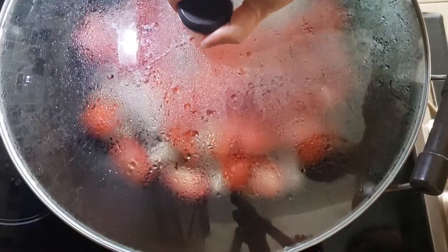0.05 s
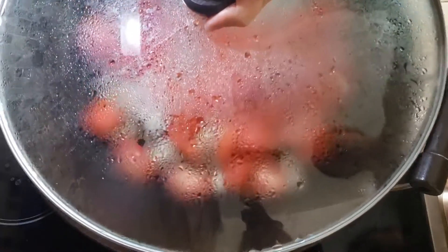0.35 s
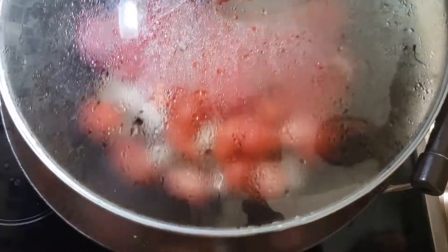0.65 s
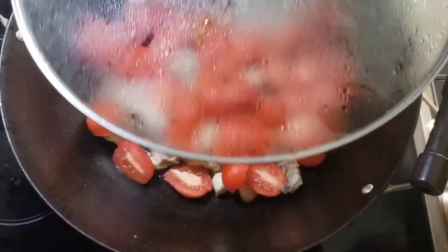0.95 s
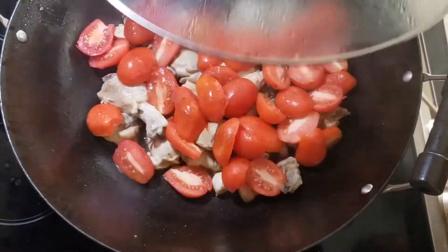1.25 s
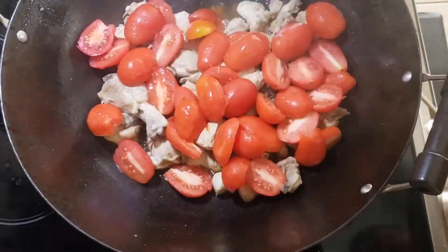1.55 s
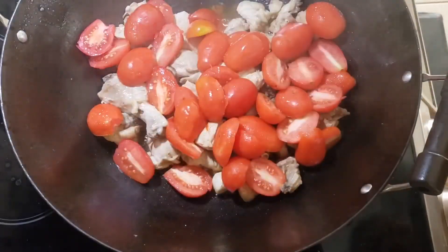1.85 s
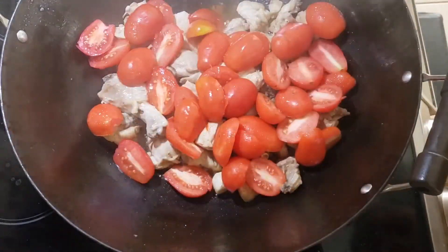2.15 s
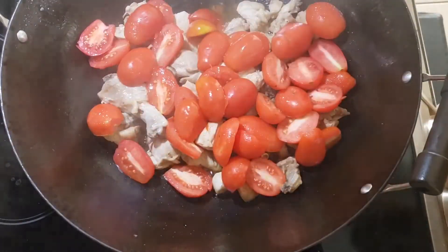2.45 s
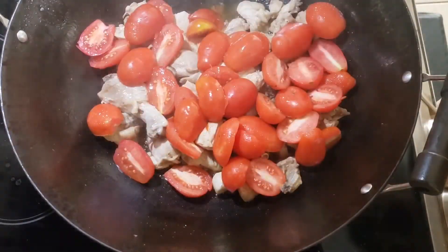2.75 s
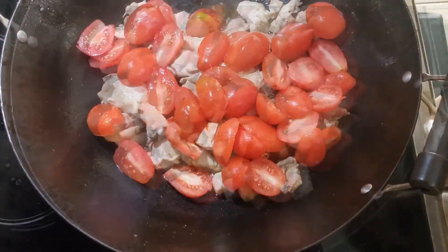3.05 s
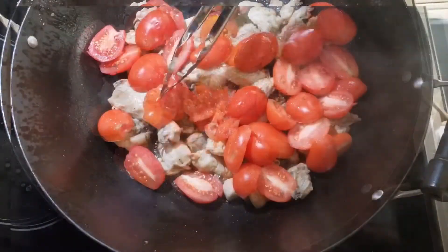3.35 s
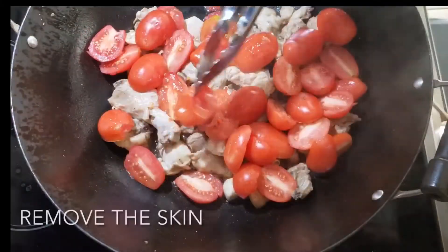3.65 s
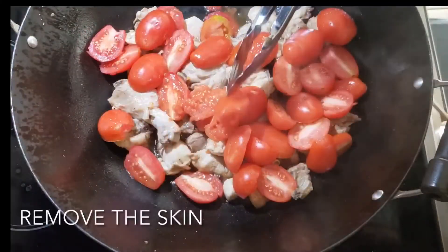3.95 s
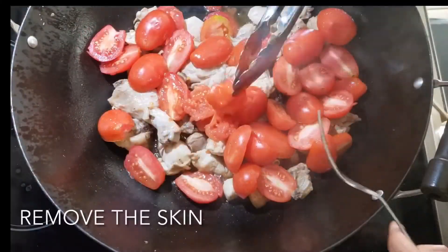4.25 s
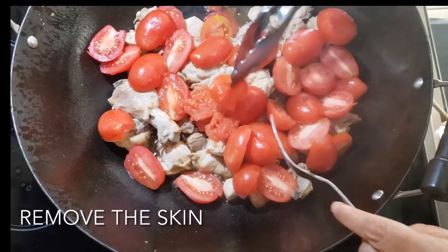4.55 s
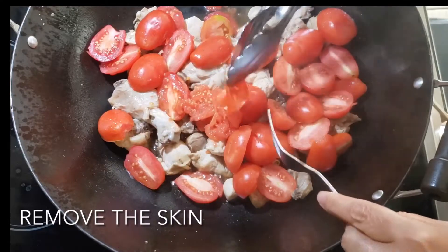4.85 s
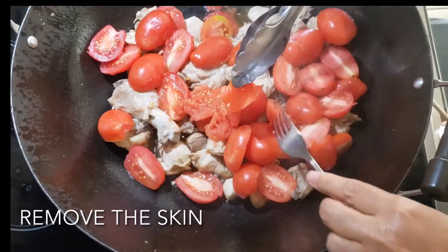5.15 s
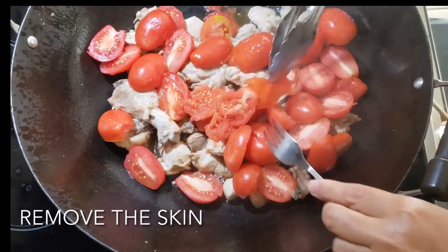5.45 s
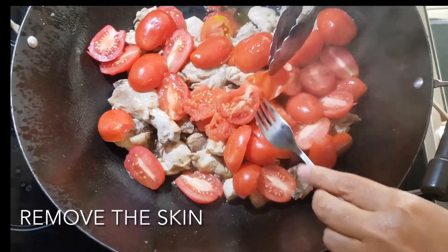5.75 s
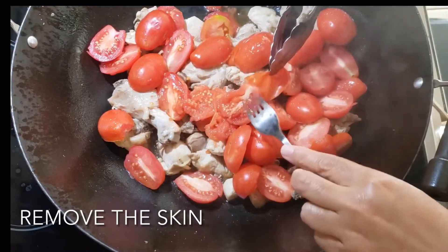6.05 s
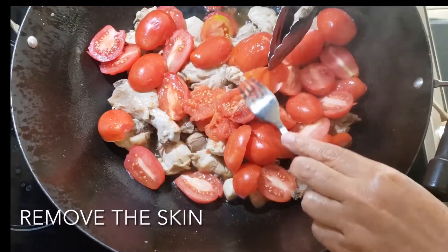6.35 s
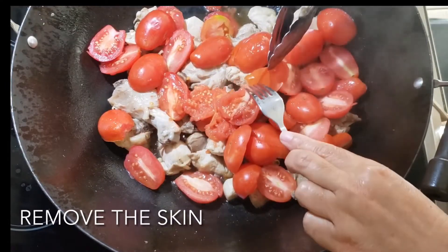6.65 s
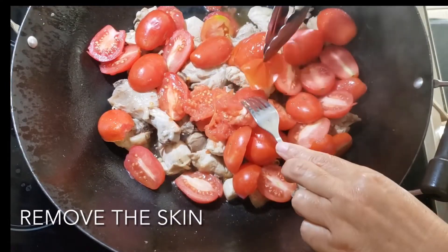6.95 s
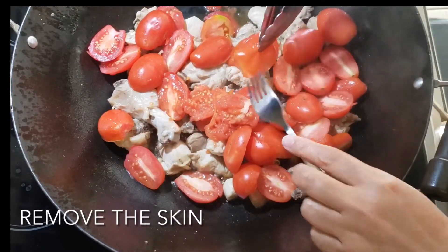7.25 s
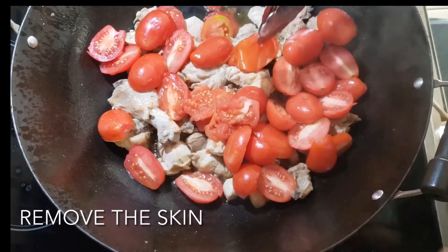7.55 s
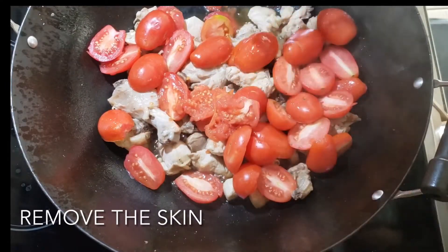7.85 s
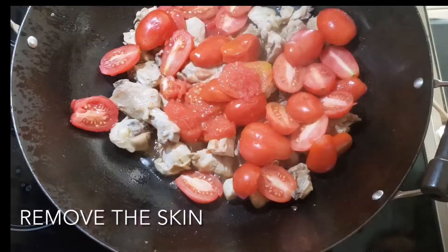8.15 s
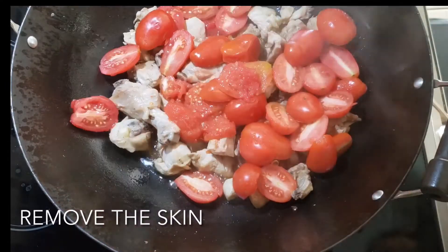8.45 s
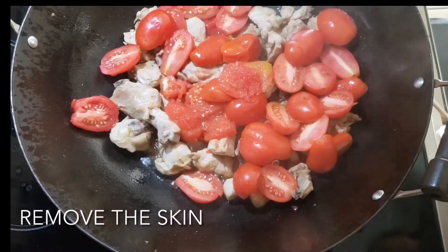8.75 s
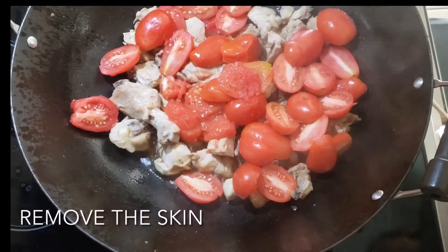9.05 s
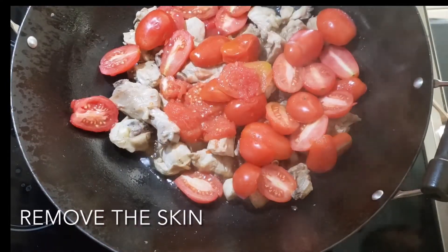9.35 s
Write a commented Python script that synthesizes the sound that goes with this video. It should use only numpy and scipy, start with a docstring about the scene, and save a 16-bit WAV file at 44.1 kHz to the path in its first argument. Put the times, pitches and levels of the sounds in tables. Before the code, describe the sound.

Over a low motor hum in a kitchen, a bird cries nasally outside as a glass lid knocks on a wok. Close sizzling of tomatoes grows, with spitting drips and sharp pops, until the lid is set down with two clanks. Only a gentle hiss follows, with tiny wet tearing sounds and low puffs of air on the microphone. The bird cries again now and then, answered from afar, with a few faint chirps and whistles.

```python
"""Tomatoes sizzle in a wok, close to the microphone in a kitchen. The glass lid is lifted, drips spit
on the hot steel, fat bubbles burst and the lid is set down. The sizzle sinks to a soft hiss and the
image closes to mono; wet skins tear as they are pulled off. Motors hum and air buffets the microphone.
Outside, a bird's nasal, falling cries rebound from walls and are answered from afar, among a few
chirps and distant whistles."""
import sys
import numpy as np
from scipy import signal
from scipy.fft import rfft, irfft
from scipy.io import wavfile
from scipy.ndimage import uniform_filter1d

SR = 44100
rng = np.random.default_rng(int(sys.argv[2]) if len(sys.argv) > 2 else 0)


def inscribe(sig):
    """Save sig as 16-bit PCM at rate SR to the path in sys.argv[1].

    A 1-D sig is mono; a 2-D sig holds one channel per row.
    Samples are clipped to [-1, 1] before scaling.
    """
    pcm = np.round(np.clip(np.atleast_2d(sig).T, -1, 1) * 32767)
    wavfile.write(sys.argv[1], SR, pcm.astype(np.int16))


N = 414540
TIME = np.arange(N) / SR

# the nasal voice of cry and answer, led by its fourth partial: (multiple of the pitch, level [dB])
CRY_SPECTRUM = [(2, -11.5), (3, -16.5), (4, -4.5), (5, -15.5), (6, -24), (7, -23), (8, -18), (9, -25),
                (10, -23), (11, -20), (12, -25.5), (13, -33), (14, -24), (15, -23), (16, -23)]


def from_db(db):
    """Decibels to gain."""
    return 10 ** (np.asarray(db) / 20)


def rms_one(x):
    """Scale to unit power."""
    return x / np.sqrt(np.mean(x ** 2) + 1e-20)


def level(rows):
    """A curve of (time [s], level [dB]) as a gain at every sample."""
    return from_db(np.interp(TIME, *np.transpose(rows)))


def drift(per_s, count=N):
    """A random wander between knots with a spread of 1."""
    knots = rng.standard_normal(2000)
    return np.interp(TIME[:count] * per_s, np.arange(len(knots)), knots)


def coloured(x, spectrum, tilt_db=0):
    """Give x a spectrum, tilted per octave above 800 Hz; unit power."""
    octave = np.log2(np.maximum(np.arange(N // 2 + 1) * SR / N, 1))
    hz, db = np.transpose(spectrum)
    shape_db = np.interp(octave, np.log2(hz), db) + tilt_db * np.maximum(octave, np.log2(800))
    low_cut_db = 18 * np.minimum(octave - np.log2(hz[0]), 0)
    return rms_one(irfft(rfft(x) * from_db(shape_db + low_cut_db), N))


def crackle(per_s, spread_db, smooth):
    """Tiny bursts of uneven size over a smooth hiss, unrelated in two channels."""
    sizes = from_db(spread_db * np.minimum(rng.exponential(1, (2, N)), 4)) * rng.choice([-1, 1], (2, N))
    clicks = rms_one(sizes * (rng.random((2, N)) < per_s / SR))
    return rms_one(clicks + smooth * rng.standard_normal((2, N)))


def spread(pair, side, left_db):
    """Two unrelated signals as mid and side, leaning left; the side carries no bass."""
    wide = signal.sosfilt(signal.butter(2, 500, "high", fs=SR, output="sos"), pair[1])
    return (pair[0] + side * wide * np.array([[1], [-1]])) * from_db([[left_db / 2], [-left_db / 2]])


def add(out, x, start):
    """Mix x in at a time in seconds."""
    at = max(round(start * SR), 0)
    out[at:at + len(x)] += x[:N - at]


def burst(start, length, t60, rise=0.00096):
    """An envelope: rise, hold, exponential fall."""
    out, age = np.zeros(N), TIME[:SR]
    add(out, np.minimum(age / rise, 1) * from_db(-60 * np.maximum(age - length, 0) / t60), start)
    return out


def swell(start, length, rise=0.058, fall=0.18):
    """An envelope: rise, hold, straight fall."""
    return np.interp(TIME, start + np.cumsum([0, rise, max(length - rise, 0), fall]), [0, 1, 1, 0])


def strike(modes, scatter_db):
    """One blow rings every mode with a strength of its own."""
    t, ring = TIME[:SR // 3], 0
    for k, (hz, db, t60) in enumerate(modes):
        decay = from_db(db + scatter_db * rng.normal() - 60 * t / t60)
        ring += (-1) ** k * decay * np.sin(2 * np.pi * hz * t)
    return ring


def blows(rows, modes):
    """Blows on one body; a soft contact loses its treble."""
    out = np.zeros(N)
    for start, db, cutoff_hz in rows:
        pole = np.exp(-2 * np.pi * cutoff_hz / SR)
        ring = signal.lfilter([1 - pole], [1, -pole], strike(modes, scatter_db=1))
        add(out, from_db(db) * ring, start)
    return out


def echoes(x, t60, build_s):
    """Scattered reflections, different on each side, with the power of x."""
    t = TIME[:SR]
    tail = rng.standard_normal((2, SR)) * from_db(-60 * t / t60) * np.clip(t / build_s, 0, 1) ** 2
    return signal.fftconvolve(x[None], tail / np.sqrt(np.sum(tail ** 2) / 2), axes=1)[:, :N]


def room_and_motors(settled):
    """The kitchen's low rumble holds a faint steady tone; motors hum over it."""
    # the rumble's faint low tone (49.5 Hz), then the motors' hum lines:
    # (frequency [Hz], level during the sizzle [dB], level afterwards [dB])
    steady_tones = [(49.5, -63, -63), (89.7, -60, -60), (119.8, -58.5, -76), (179.3, -71, -78),
                    (193, -80, -70.5), (239.6, -74, -90)]
    # the rumble: (frequency [Hz], level [dB])
    room_colour = [(12, -39), (25, -4.5), (50, -1), (70, -6), (105, -9.5), (140, -15.5), (220, -20.5),
                   (400, -26.5), (1000, -71)]
    tones = 0
    for hz, early_db, late_db in steady_tones:
        gain = from_db(early_db + (late_db - early_db) * settled + 0.93 * drift(3))
        tones += np.sqrt(2) * gain * np.sin(2 * np.pi * hz * TIME + 0.43 * drift(1.965))
    return tones + from_db(-51 - 1.33 * settled) * coloured(rng.standard_normal(N), room_colour)


def buffeting():
    """Puffs of air rumble on the microphone, each a bell curve in time; they add in power."""
    # air on the microphone: (frequency [Hz], level [dB])
    air_colour = [(10, -52), (20, -11.5), (33, 5), (50, -2.5), (70, -10.5), (110, -24.5), (170, -35),
                  (400, -69), (1000, -78)]
    # puffs: (time of peak [s], half width [s], level [dB])
    puffs = [(5.62, 0.064, -41), (6.1, 0.36, -44.5), (6.46, 0.029, -37.5), (7.0, 0.19, -47),
             (7.249, 0.035, -26.5), (7.389, 0.022, -30), (7.49, 0.047, -27), (7.629, 0.024, -30.5),
             (7.79, 0.12, -42), (8.24, 0.097, -46.5), (8.679, 0.066, -43), (9.1, 0.26, -39),
             (9.24, 0.028, -29.5), (9.39, 0.036, -34.5)]
    air = coloured(rng.standard_normal(N), air_colour)
    air /= np.sqrt(uniform_filter1d(air ** 2, size=SR // 8))   # the puffs alone set its strength
    power = sum(from_db(db) ** 2 * np.exp(-((TIME - peak) / width) ** 2) for peak, width, db in puffs)
    return air * np.sqrt(power)


def gesture(count, voice, sag):
    """A call scoops up, arches over a crest and drops: (pitch ratio, depth in scoop or drop, rasp)."""
    t, u = TIME[:count], np.linspace(0, 1, count)
    scooping = np.clip(1 - t / voice["scoop_s"], 0, 1)
    dropping = np.clip(1 - t[::-1] / voice["drop_s"], 0, 1)
    arch = 1 - sag * np.abs(u - voice["crest"]) ** 1.5
    bend = arch * (1 - voice["scoop"] * scooping) * (1 - voice["drop"] * dropping)
    edge = scooping + dropping
    rasp = voice["rasp"] + voice["late_rasp"] * u ** 5.2 + voice["edge_rasp"] * edge
    return bend, edge, np.clip(rasp, 0, 1)


def resonance(hz, centre_hz, db, octaves):
    """The lift in dB of a partial gliding through a resonance."""
    return db * np.exp(-(np.log2(hz / centre_hz) / octaves) ** 2)


def bird(calls, voice, partials, lead, jitter, breath, fray=False, waver_db=2.5, chest_db=0):
    """A harmonic voice around its lead partial, through throat and beak: (direct sound, echo send)."""
    # calls: (time [s], length [s], crest pitch [Hz], sag [share of pitch], level [dB],
    # loudest point [share of length], swell [dB], echo send [dB], tilt [dB/octave],
    # throat resonance [Hz], odd partials [dB])
    # resonances of windpipe and beak: (frequency [Hz], height [dB], width [octaves])
    beak = [(3880, 1, .064), (6530, 8, 0.047), (8300, 2.5, .04)]
    direct, send = np.zeros(N), np.zeros(N)
    for start, length, crest_hz, sag, db, loudest, swell_db, echo_db, tilt_db, throat_hz, odd_db in calls:
        count = int(length * SR)
        u = np.linspace(0, 1, count)
        bend, edge, rasp = gesture(count, voice, sag)
        shape_db = voice["edge_db"] * edge - swell_db * (u - loudest) ** 2
        # a rasping voice shakes in pitch and strength and sheds noise
        hz = crest_hz * bend * (1 + jitter * rasp * drift(700, count) + 0.00353 * drift(32.1, count))
        shake = 1 + rasp * drift(500, count)
        noise = rasp * breath[int(start * SR):][:count]
        phase, tone = 2 * np.pi * np.cumsum(hz) / SR, 0
        for k, partial_db in partials:
            octave = np.log2(k / lead)
            tract_db = resonance(k * hz, throat_hz, db=7, octaves=0.26)
            tract_db += sum(resonance(k * hz, *peak) for peak in beak)
            slope_db = (tilt_db + voice["edge_bright_db"] * edge) * octave
            slope_db += 2 * rasp * max(octave, 0)   # rasp lifts the upper partials
            slope_db += chest_db * (.5 - u) * max(-octave, 0)   # the low partials start strong and fade
            flutter_db = waver_db * (k / lead) ** 0.39 * drift(43.3, count)
            # partials far from the lead fray in phase, more so as the call runs out
            slip = fray * abs(k - lead) / lead * (.45 + 2.6 * u ** 2) * drift(220, count)
            gain = from_db(partial_db + odd_db * (k % 2) + tract_db + slope_db + flutter_db)
            tone += gain * np.sin(k * phase + slip)
        gate = np.clip(np.minimum(u, 1 - u) * length / 0.00063, 0, 1)
        call = (np.sqrt(2) * tone * shake + noise) * gate * from_db(db + shape_db)
        add(direct, call, start)
        add(send, call * from_db(echo_db), start)
    return direct, send


def whistles():
    """Far off, a bird whistles soft, rough arches on a single partial."""
    # whistles: columns as for calls in bird()
    calls = [(2.315, .135, 1430, .37, -54.5, .5, 10, -14, 0, 1350, 0),
             (2.59, .11, 1280, .25, -60, .45, 10, -14, 0, 1350, 0),
             (3.025, .125, 1440, .4, -59, .45, 10, -14, 0, 1350, 0),
             (3.335, .11, 1330, .33, -58.5, .45, 12, -14, 0, 1350, 0),
             (3.465, .06, 1400, .25, -67, .45, 12, -14, 0, 1350, 0)]
    voice = dict(crest=0.442, scoop=0, scoop_s=0.022, drop=0, drop_s=.02,
                 edge_db=-2, edge_bright_db=10, rasp=0.39, late_rasp=0, edge_rasp=0)
    return bird(calls, voice, [(0.98, 0)], lead=1, jitter=0.071, breath=np.zeros(N))


def answers(breath):
    """A second bird answers from afar, raspy and starting low in the chest."""
    # answers: columns as for calls in bird()
    calls = [(.31, .28, 977, .15, -55.5, 0.66, 11, -13, -1, 3720, -15),
             (6.185, .345, 917, .2, -61.5, 0.57, 10, -12, -4, 3450, -13)]
    voice = dict(crest=0.12, scoop=0.037, scoop_s=0.0277, drop=0, drop_s=.03,
                 edge_db=-3, edge_bright_db=-1, rasp=0.19, late_rasp=.15, edge_rasp=0)
    return bird(calls, voice, CRY_SPECTRUM, lead=4, jitter=0.072, breath=breath, fray=True, chest_db=15)


def chirps(breath):
    """Out in the yard, each chirp is one short, clear, high arch."""
    # chirps: columns as for calls in bird()
    calls = [(1.828, .042, 6120, .11, -59.5, .55, 14, -4, -20, 6000, 0),
             (3.714, .038, 5930, .11, -53.5, .6, 17, -8, -8, 11800, 0)]
    # their partials: (multiple of the pitch, level [dB])
    partials = [(1, 0), (2, 12.5)]
    voice = dict(crest=0.6, scoop=0.02, scoop_s=0.0028, drop=0.043, drop_s=0.0075,
                 edge_db=9, edge_bright_db=-16, rasp=0.02, late_rasp=0.04, edge_rasp=.05)
    return bird(calls, voice, partials, lead=1, jitter=0.047, breath=breath, waver_db=0.725)


def chips(breath):
    """The voice catches, low and rough, just before and after the second chirp."""
    # chips: columns as for calls in bird(); a negative sag makes the pitch rise
    calls = [(3.707, .007, 1400, -.8, -63, .6, 12, -3, 0, 3900, 0),
             (3.755, .008, 2030, .24, -57, .5, 16, 3, 0, 3800, 0)]
    # their partials: (multiple of the pitch, level [dB])
    partials = [(1, -9), (2, 0)]
    voice = dict(crest=0.08, scoop=0, scoop_s=0.0025, drop=0, drop_s=.002,
                 edge_db=2, edge_bright_db=-14, rasp=0.45, late_rasp=0, edge_rasp=0)
    return bird(calls, voice, partials, lead=2, jitter=0.065, breath=breath, waver_db=0.625)


def cries(breath):
    """The nearer bird gives nasal, falling cries that turn hoarse as they run out."""
    # cries: columns as for calls in bird()
    calls = [ (.177, 0.3, 838, 0.17, -44, 0.47, 22, -13.5, -1, 3380, -2),
             (5.037, 0.34, 841, 0.2, -53, 0.45, 10, -4.5, -1.2, 3270, 3),
             (7.434, .298, 843, .19, -55, 0.25, 3, -1, -2.5, 2900, 4), ]
    voice = dict(crest=.09, scoop=.26, scoop_s=.015, drop=0.059, drop_s=0.0337,
                 edge_db=-6, edge_bright_db=-2, rasp=0.057, late_rasp=0.4, edge_rasp=0.39)
    return bird(calls, voice, CRY_SPECTRUM, lead=4, jitter=0.049, breath=breath, fray=True)


def walls(send):
    """Walls outside return dull rebounds and a scattered tail."""
    # rebounds, the nearest beating against the gliding voice: (delay [s], level [dB])
    rebounds = [(.00986, -7.5), (.04, -15), (0.104, -4.2), (.15, -16), (.21, -17)]
    dull = signal.sosfilt(signal.butter(2, [2100, 4300], "band", fs=SR, output="sos"), send + 1e-18)
    out = np.zeros(N)
    for delay, db in rebounds:
        add(out, from_db(db) * dull, delay)
    return out + from_db(-1.5) * echoes(dull, t60=1.46, build_s=0.011)


def birds():
    """The birds outside, each at its distance; scattered reflections soften the far ones."""
    # breath noise of a rasping voice: (frequency [Hz], level [dB])
    breath_colour = [(2200, -13), (3300, 5), (3900, 5), (4500, 8), (5200, -13), (9000, 0), (15000, -33)]
    breath = coloured(rng.standard_normal(N), breath_colour)
    cry, cry_send = cries(from_db(2) * breath)
    answer, answer_send = answers(from_db(-7) * breath)
    chirp, chirp_send = chirps(from_db(14) * breath)
    chip, chip_send = chips(from_db(2) * breath)
    whistle, whistle_send = whistles()
    far = answer + whistle
    distant = from_db(-6.5) * far + from_db(-12) * echoes(far, t60=0.49, build_s=0.0021)
    yard = echoes(chirp_send, t60=0.32, build_s=0.0081) + echoes(chip_send, t60=.33, build_s=0.0072)
    return distant + chirp + chip + yard + cry + walls(cry_send + answer_send + whistle_send)


def lid_knocks():
    """The glass lid, damped by the hand, knocks as it comes off."""
    # contacts: (time [s], level [dB], treble cutoff [Hz])
    knocks = [(.206, -40, 2500), (.218, -38.5, 4000), (.226, -44.5, 600), (.351, -41, 500),
              (.594, -46.5, 3500), (.722, -46.5, 400)]
    # the lid's ring: (frequency [Hz], level [dB], t60 [s])
    modes = [(296, 1, 0.061), (453, 1.5, 0.028), (620, -1.5, 0.036), (850, 3, 0.015), (1120, -5.5, 0.02),
             (1720, -1, 0.019), (2300, -13, .015)]
    return blows(knocks, modes)


def wok_knocks():
    """Lid and utensils touch the wok as they are put down."""
    # contacts: (time [s], level [dB], treble cutoff [Hz])
    knocks = [(3.1865, -27.5, 3970), (3.192, -34, 1800), (3.3065, -35, 1800), (3.3125, -32, 1400),
              (4.379, -45, 3000)]
    # the wok's ring: (frequency [Hz], level [dB], t60 [s])
    modes = [(190, -8, .06), (261, -8, .035), (342, -5, .032), (424, -2, .04), (540, -7, .02),
             (660, -11, .018), (835, -10, .036), (1060, -12, .012), (1640, -19, .016), (2720, -18, .02),
             (4600, -5, .0065), (7200, -6, .006), (12500, 7, .0017)]
    return blows(knocks, modes)


def bubbles():
    """Fat bubbles burst with a pop; small bubbles ring in the juice."""
    # bursting bubbles: (time [s], level [dB])
    pops = [(.924, -46), (1.3585, -27.5), (1.69, -33), (1.948, -32), (2.024, -52), (2.095, -40),
            (2.595, -29.5), (7.802, -43)]
    # the ring of a pop: (frequency [Hz], level [dB], t60 [s])
    pop_modes = [(1090, -10, 0.0052), (1950, -4, 0.0081), (2350, -7, 0.011), (4500, -12, 0.0047)]
    # small bubbles: (time [s], level [dB], pitch [Hz])
    pips = [(2.672, -43, 3160), (6.619, -59, 2560)]
    out, pip_t60 = np.zeros(N), .045
    for start, db in pops:
        add(out, from_db(db) * strike(pop_modes, scatter_db=4.5), start)
    for start, db, hz in pips:
        add(out, strike([(hz, db, pip_t60)], scatter_db=1), start)
    return out


def contacts():
    """Knocks and bubbles with the ring of the kitchen; the wok's knocks are closer and drier."""
    lid, wok, pops = lid_knocks(), wok_knocks(), bubbles()
    room = echoes(from_db(-1.5) * (lid + pops) + from_db(-5) * wok, t60=0.44, build_s=0.0078)
    return lid + wok + pops + spread(room, side=0.6, left_db=2)


def soft_hiss():
    """The open wok hisses, swelling where juice meets hot steel."""
    # swells: (time [s], length [s], level [dB])
    swells = [(4.33, 0.18, -58.5), (5.044, 0.25, -63), (5.7, 0.17, -58.5), (6.3, 0.19, -69),
              (7.038, 0.12, -55), (7.452, 0.36, -64.5), (8.123, 0.12, -59), (8.5, .1, -59),
              (9.288, .1, -60)]
    # the hiss: (frequency [Hz], level [dB])
    colour = [(120, -59), (200, -4), (215, -8.5), (321, -14), (596, -8.5), (783, -8), (992, -6),
              (1980, -13), (2510, -15), (4100, -15), (5010, -21.5), (5490, -19), (7480, -20.5),
              (12000, -16.5), (15500, -17.5)]
    # rise and fall of its treble: (time [s], level [dB])
    treble_curve = [(4.05, -1), (4.12, 1), (4.35, -0.5), (5.35, 0), (5.6, -5), (5.9, -2), (6.25, -3),
                    (6.45, 1), (7.0, 0), (8.03, -0.5), (8.3, 1.5), (8.7, -1), (9.3, 1.5)]
    resting_db = -60
    power = from_db(resting_db) ** 2
    power += sum((from_db(db) * swell(start, length)) ** 2 for start, length, db in swells)
    flicker = from_db(1.03 * drift(22))
    hiss = np.sqrt(power) * flicker * coloured(crackle(1500, 3, smooth=1.7)[0], colour)
    treble = signal.sosfiltfilt(signal.butter(2, 6400, "high", fs=SR, output="sos"), hiss)
    return hiss + (level(treble_curve) - 1) * treble


def peeling():
    """Wet tomato skins tear with a fine crackle."""
    # tears: (time [s], length [s], level [dB])
    tears = [(6.614, 0.11, -57.5), (6.714, 0.091, -60.5), (6.812, 0.033, -54), (6.857, 0.011, -52),
             (7.799, .02, -53.5), (9.079, 0.048, -55.5)]
    # tearing skin: (frequency [Hz], level [dB])
    colour = [(2000, -8), (7000, -9), (9500, 1.5), (13500, 4.5), (15500, 3.5)]
    envelope = sum(from_db(db) * burst(start, length, t60=0.039) for start, length, db in tears)
    return envelope * coloured(crackle(2500, 2.8, smooth=0.28)[0], colour)


def spitting():
    """Drips from the lid flash to steam on the steel, and the hollow of the wok answers."""
    # drips: (time [s], length [s], hiss [dB], t60 [s], tilt [dB/octave], ring [dB], ring rise [s])
    drips = [(0.92, 0.018, -40.5, 0.42, 2, -42.5, .009), (1.266, 0.047, -50.5, 0.46, 1, -42, 0.025),
             (1.598, 0.032, -55, 0.23, -2, -47.5, .027), (1.689, 0.077, -51.5, 0.16, -2, -53, 0.024),
             (2.321, 0.0081, -51.5, 0.064, 4, -65, .02), (2.508, 0.016, -52, .12, 1, -51, .012),
             (2.664, .02, -54, .1, 4, -66, .02)]
    # the steam: (frequency [Hz], level [dB])
    steam_colour = [(250, -1), (600, -1), (1350, -2.5), (1900, -4.5), (3600, -6), (7200, -8.5), (8400, -19),
                    (15500, -21)]
    # the wok's hollow: (frequency [Hz], level [dB])
    hollow_colour = [(400, -19.5), (680, -6), (840, 1.5), (980, -5), (1300, -12), (2000, -19), (6000, -56)]
    grains = crackle(6000, 1.5, smooth=1)
    hollow = coloured(rng.standard_normal((2, N)), hollow_colour)
    steam, ring = 0, 0
    for start, length, db, t60, tilt_db, ring_db, ring_rise in drips:
        steam += from_db(db) * burst(start, length, t60) * coloured(grains, steam_colour, tilt_db)
        ring += from_db(ring_db) * burst(start, length, t60, rise=ring_rise)
    return spread(steam, side=1, left_db=3.5) + spread(ring * hollow, side=0.45, left_db=4.5)


def sizzle():
    """Tomato juice sizzles close by, a little left; it opens up as the lid comes off, then sinks away."""
    # strength of the sizzle: (time [s], level [dB])
    curve = [(0, -54), (.35, -52.5), (1.05, -50), (1.6, -47.5), (2.85, -48), (3.3, -52), (3.42, -63.5),
             (3.6, -100)]
    # its spectrum: (frequency [Hz], level [dB])
    colour = [(120, 7), (200, -1.5), (399, -3), (437, -6.5), (497, -0.5), (596, -4), (906, -1.5),
              (1130, -4), (1350, -2), (2250, -1), (2960, -2.5), (5390, -10), (7220, -7.5), (8820, -15),
              (12200, -10.5), (15500, -11.5)]
    envelope = level(curve) * from_db(1.36 * drift(20))
    return spread(envelope * coloured(crackle(2500, 2.7, smooth=1), colour), side=0.79, left_db=2)


def scene():
    """Wok in front, motors behind, birds outside; the image closes to the centre as the sizzle sinks."""
    settled = np.interp(TIME, [3.22, 3.447], [0, 1])
    mix = sizzle() + spitting() + contacts() + birds()
    mix += settled * (soft_hiss() + peeling())
    mix += room_and_motors(settled) + buffeting()
    return mix + settled * (mix.mean(axis=0) - mix)


def record(dry):
    """The top is cut steeply at 15.8 kHz."""
    return signal.sosfilt(signal.ellip(12, .1, 80, 15800, fs=SR, output="sos"), dry)


dry = scene()
out = record(dry)
inscribe(out)
```